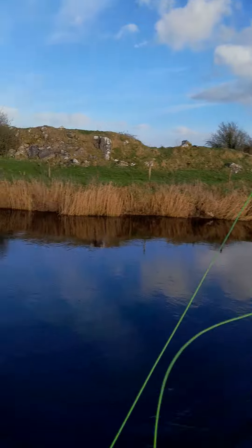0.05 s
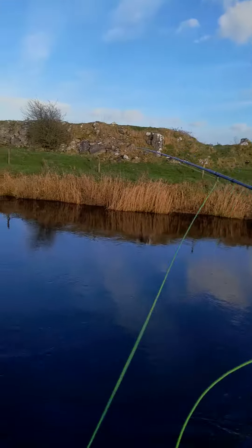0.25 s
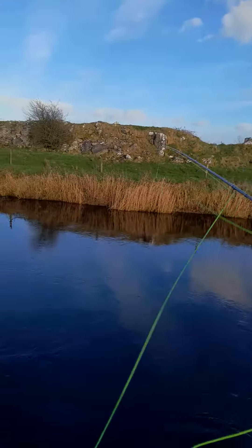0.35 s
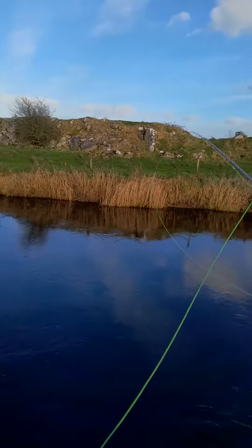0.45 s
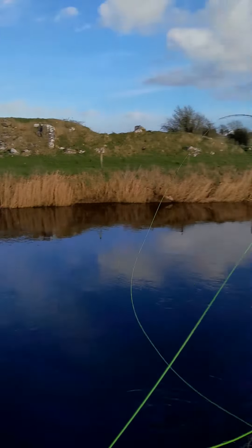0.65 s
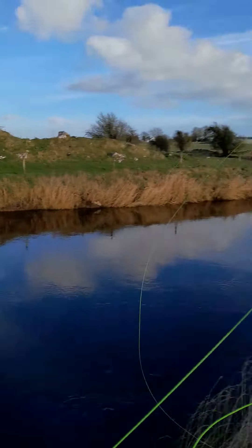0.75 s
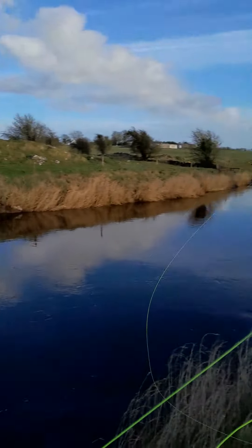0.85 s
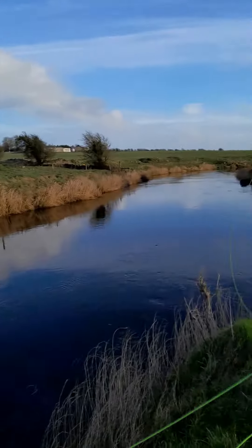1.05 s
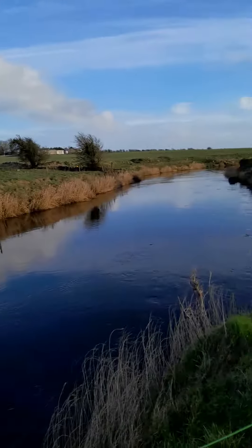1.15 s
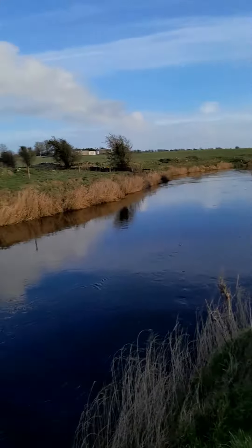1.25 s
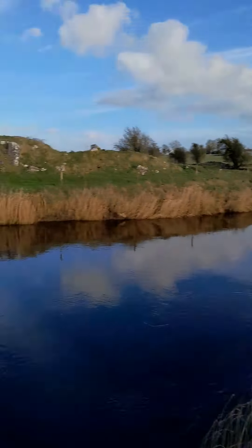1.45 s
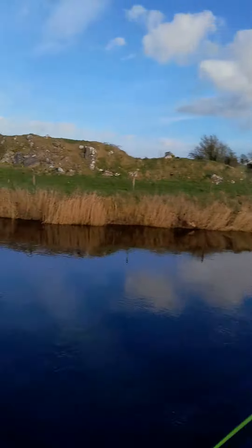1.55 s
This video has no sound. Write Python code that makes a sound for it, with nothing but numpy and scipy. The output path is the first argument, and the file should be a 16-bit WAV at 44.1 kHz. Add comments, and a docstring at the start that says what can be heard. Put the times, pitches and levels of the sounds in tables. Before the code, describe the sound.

Fly line and rod whoosh by a river, shrill brief zip, then heavy wind thumps on the left

```python
"""Two low thumps strike the right port at once, over wind rumble, faint line hiss and a soft rush of air.
A fly rod is swung beside a river, close to a camera: its line zips shrilly through the rings, whistles
down in pitch as it slows, and ticks against the rod. Wind and eddies then hit the left port hardest.
Rumble, hiss, air and zips are shaped noise; eddies are pressure pulses; swishes are gliding noise bands;
ticks are damped sines with a crack of noise."""
import sys
import numpy as np
from scipy import signal
from scipy.fft import rfft, irfft, next_fast_len
from scipy.io import wavfile
from scipy.ndimage import map_coordinates

SR = 44100
rng = np.random.default_rng(int(sys.argv[2]) if len(sys.argv) > 2 else 0)


def store_wav(level_fs):
    """Save 16-bit WAV to argv[1]."""
    pcm = np.round(np.clip(np.atleast_2d(level_fs), -1, 1) * 32767)
    wavfile.write(sys.argv[1], SR, pcm.T.astype(np.int16))


N = 70560
T = np.arange(N) / SR
# pan position of each port name [-1 left .. 1 right]
PORT_PAN = {"left": -1, "both": 0, "right": 1}


def amp(db):
    """Decibels to gain."""
    return 10 ** (np.asarray(db) / 20)


def unit(x):
    """Scale to rms 1."""
    return x / np.sqrt(np.mean(x ** 2) + 1e-20)


def noise():
    """White Gaussian noise, one channel."""
    return rng.standard_normal(N)


def level(rows):
    """Gain per sample, linear in dB between (t/s, level/dB) points."""
    return amp(np.interp(T, *np.transpose(rows)))


def wobble(knots_per_s):
    """Smooth random curve through evenly spaced random knots."""
    return map_coordinates(rng.standard_normal(N // 4), [T * knots_per_s], mode="mirror")


def filtered(x, response):
    """Multiply the spectrum of x by a response of frequency."""
    m = next_fast_len(N + 8192)  # zero padding
    gain = response(np.fft.rfftfreq(m, 1 / SR))
    return irfft(rfft(x, m) * gain, m)[..., :N]


def coloured(x, spectrum):
    """Shape x by (f/Hz, level/dB) points on a log axis, at rms 1."""
    f_hz, db = np.transpose(spectrum)
    return unit(filtered(x, lambda hz: amp(np.interp(np.log(hz + 1), np.log(f_hz), db))))


def placed(x, pan):
    """Equal-power pan between the two ports."""
    angle = (np.clip(pan, -1, 1) + 1) * np.pi / 4
    return np.outer([np.cos(angle), np.sin(angle)], x)


def turbulence(spectrum, window_samples):
    """Churning pressure noise, its power evened out over a sliding window."""
    x = coloured(noise(), spectrum)
    instant_power = np.abs(signal.hilbert(x)) ** 2
    power = signal.fftconvolve(instant_power, signal.windows.hann(window_samples), "same")
    return unit(x / np.sqrt(np.abs(power) + 1e-9))


# rumble at each port, before port limiting [t/s, level/dB]
RUMBLE_LEVEL_LEFT = [(0, -45.5), (.11, -47), (.18, -35.5), (.215, -22), (.272, -20), (.292, -27),
                     (.325, -17.5), (.355, -23.5), (.385, -12), (.42, -18.5), (.447, -48), (.475, -81.5),
                     (.75, -77.5), (.81, -57.5), (.912, -52.5), (.95, -78), (1.3, -83), (1.35, -66),
                     (1.47, -67), (1.55, -58.5), (1.6, -62)]
RUMBLE_LEVEL_RIGHT = [(0, -33), (.1, -44.5), (.31, -41.5), (.45, -51), (.6, -52.5), (.76, -69.5),
                      (.772, -52), (.815, -50), (.835, -61.5), (.885, -48.5), (.925, -53), (.96, -64.5),
                      (1.06, -66), (1.15, -54.5), (1.2, -69.5), (1.34, -53.5), (1.37, -71.5), (1.6, -77)]
# rumble spectra, and the brighter churn of faster air on the left [f/Hz, level/dB per Hz]
RUMBLE_SPECTRUM_LEFT = [(20, -40.5), (42, -9.5), (70, 6.5), (135, 2), (250, -13.5), (400, -28),
                        (700, -53.5), (1500, -89.5)]
RUMBLE_SPECTRUM_RIGHT = [(20, -21), (40, 5), (70, 1.5), (150, -0.5), (300, -12.5), (500, -28.5),
                         (1000, -35.5), (3000, -84.5)]
CHURN_SPECTRUM = [(90, -14), (125, 3), (210, 3), (370, -7), (500, -18.5), (800, -33.5), (1150, -40.5),
                  (1700, -56.5), (2500, -80)]
CHURN_DB, CHURN_EXPONENT = 2, 1.42  # level at rumble gain 1; exponent on rumble gain


def buffeting():
    """Independent turbulence at each port; on the left, stronger gusts are brighter."""
    gust = level(RUMBLE_LEVEL_LEFT)
    rumble = gust * turbulence(RUMBLE_SPECTRUM_LEFT, window_samples=900)
    churn_gain = amp(CHURN_DB) * gust ** CHURN_EXPONENT
    churn = churn_gain * turbulence(CHURN_SPECTRUM, window_samples=600)
    right = level(RUMBLE_LEVEL_RIGHT) * turbulence(RUMBLE_SPECTRUM_RIGHT, window_samples=1600)
    return np.array([rumble + churn, right])


# eddies, before rebound and port limiting [t/s, peak level/dB, centre f/Hz, port]
EDDY_HITS = [(.0049, -16.5, 400, "right"), (.0077, -17, 171.5, "right"), (0.2099, -2.5, 250, "left"),
             (0.2204, -10, 120, "left"), (.2229, -6.5, 180, "left"), (0.3746, -5.5, 250, "left"),
             (0.3782, 3.5, 165, "left"), (0.3858, -1, 135, "left"), (0.3884, -8.5, 210, "left"),
             (0.4021, -10.5, 190, "left"), (.4135, -9, 160, "left")]
REBOUND_HZ, REBOUND_Q = 68, 1.5


def eddies():
    """A passing eddy is a brief suction between two small pressure rises, then a low rebound."""
    out = np.zeros((2, N))
    for start_s, db, centre_hz, port in EDDY_HITS:
        u = (np.pi * centre_hz * (T - start_s)) ** 2
        pulse = (3 * u - 1) / (1 + u) ** 3
        out += placed(amp(db) * pulse, PORT_PAN[port])

    def rebound(hz):  # resonant high-pass
        return hz ** 2 / (hz ** 2 - REBOUND_HZ ** 2 - 1j * hz * REBOUND_HZ / REBOUND_Q)
    return filtered(out, rebound)


PORT_LIMIT, PORT_CUTOFF_HZ = 1, 1750


def wind():
    """The ports give way softly under the hardest blows and muffle what gets through."""
    pressure = PORT_LIMIT * np.tanh((buffeting() + eddies()) / PORT_LIMIT)
    return filtered(pressure, lambda hz: 1 / np.sqrt(1 + (hz / PORT_CUTOFF_HZ) ** 8))


CATCHES_PER_S = 900


def friction(spectrum, grain_db):
    """Smooth sliding noise with a dense patter of tiny catches."""
    catches = (rng.random(N) < CATCHES_PER_S / SR) * (rng.random(N) - .5)
    return coloured(noise() + amp(grain_db) * unit(catches), spectrum)


# line hiss on each side [t/s, level/dB]
HISS_LEVEL_LEFT = [(0, -55.5), (.1, -56.5), (.122, -51.5), (.16, -57.5), (.21, -53.5), (.24, -61),
                   (.36, -67.5), (.5, -78.5), (.68, -77), (.78, -72.5), (.91, -68.5), (1.05, -81.5),
                   (1.2, -79.5), (1.39, -69.5), (1.48, -73), (1.6, -60.5)]
HISS_LEVEL_RIGHT = [(0, -55.5), (.05, -47), (.09, -62), (.12, -55.5), (.18, -65.5), (.29, -64),
                    (.47, -76.5), (.9, -71.5), (.95, -84.5), (1.06, -82), (1.18, -66.5), (1.33, -63),
                    (1.41, -63.5), (1.47, -71.5), (1.58, -64)]
# hiss spectra [f/Hz, level/dB per Hz]
LINE_SPECTRUM_LEFT = [(500, -33.5), (1500, -7.5), (2800, 2.5), (5000, -4.5), (6800, -1), (8200, -3.5),
                      (9300, -13.5), (12000, -8.5), (15500, -9)]
LINE_SPECTRUM_RIGHT = [(500, -27), (1300, -11.5), (2200, -0.5), (4200, -0.5), (6500, -0.5), (8100, -12),
                       (9500, -12), (11500, -5.5), (15500, -10.5)]


def sliding_line():
    """Sliding friction hisses on the left and, a little more coarsely, on the right."""
    left = level(HISS_LEVEL_LEFT) * friction(LINE_SPECTRUM_LEFT, grain_db=-3.0)
    right = level(HISS_LEVEL_RIGHT) * friction(LINE_SPECTRUM_RIGHT, grain_db=0.5)
    return np.array([left, right])


# rush of air over bank and reeds, before port gains and flutter [t/s, level/dB]
AIR_LEVEL = [(0, -52.5), (.1, -55), (.3, -58.5), (.45, -74.5), (.6, -70.5), (.73, -77), (.88, -70.5),
             (1.04, -75), (1.26, -72.5), (1.37, -77), (1.48, -74), (1.55, -63), (1.6, -68.5)]
# its spectrum [f/Hz, level/dB per Hz]
REED_SPECTRUM = [(120, -37), (260, 8.5), (450, 8.5), (750, 3), (1300, -3.5), (2000, -2.5), (3500, -15.5),
                 (8000, -34.5), (16000, -51.5)]
AIR_PORT_GAIN_DB = [[1.5], [5.5]]  # left, right
FLUTTER_DB, FLUTTER_KNOTS_PER_S = 0.37, 38


def air():
    """Diffuse rush: independent, slightly fluttering noise at the two ports."""
    ports = []
    for _ in range(2):
        rush = coloured(noise(), REED_SPECTRUM)
        ports.append(rush * amp(FLUTTER_DB * wobble(FLUTTER_KNOTS_PER_S)))
    return level(AIR_LEVEL) * np.array(ports) * amp(AIR_PORT_GAIN_DB)


# line and rod cutting the air [t/s, length/s, start f/Hz, end f/Hz, width/Hz, level/dB, port]
SWISH_EVENTS = [(0.015, 0.062, 996.3, 1096, 2940, -40.5, "right"),
                (0.108, 0.056, 5530, 3140, 1200, -50.5, "left"),
                (0.14, 0.09, 6100, 3880, 890, -54.5, "left"), (0.372, 0.32, 360, 419.3, 408, -61.5, "both"),
                (0.698, .28, 2293, 2796, 1504, -73, "both"), (1.251, .21, 12000, 12470, 6400, -67, "right")]


def swishes():
    """Shed vortices make a noise band that swells, fades and glides in pitch."""
    out = np.zeros((2, N))
    for start_s, length_s, start_hz, end_hz, width_hz, db, port in SWISH_EVENTS:
        u = np.clip((T - start_s) / length_s, 0, 1)
        centre_hz = start_hz * (end_hz / start_hz) ** u
        phase = 2 * np.pi * np.cumsum(centre_hz) / SR
        a, b = filtered(rng.standard_normal((2, N)), lambda hz: np.exp(-2 * (hz / width_hz) ** 2))
        band = unit(a * np.cos(phase) + b * np.sin(phase))
        out += placed(amp(db) * np.sin(np.pi * u) * band, PORT_PAN[port])
    return out


# line jerking through the rings [t/s, level/dB, t60/s]
ZIP_EVENTS = [(0.104, -33, 0.09), (0.205, -54, 0.035)]
# its spectrum [f/Hz, level/dB per Hz]
ZIP_SPECTRUM = [(2000, -32), (4000, -29), (5500, -14.5), (6800, -11), (7600, -5.5), (8300, -5),
                (9300, -22.5), (11000, -27.5), (15500, -22.5)]
ZIP_ATTACK_S = 0.0043


def zips():
    """A sudden pull makes the line sing shrilly in the rings and die away, on the left."""
    envelope = np.zeros(N)
    for start_s, db, t60_s in ZIP_EVENTS:
        rise = np.clip((T - start_s) / ZIP_ATTACK_S, 0, 1)
        decay_db = -60 * np.maximum(T - start_s - ZIP_ATTACK_S, 0) / t60_s
        envelope += rise * amp(db + decay_db)
    return placed(envelope * coloured(noise(), ZIP_SPECTRUM), PORT_PAN["left"])


# line tapping the rod [t/s, level/dB, ring f/Hz, port]
TICK_EVENTS = [(.165, -38.5, 2170, "right"), (0.278, -39.5, 2600, "right"), (0.675, -49, 5200, "right"),
               (.882, -50.5, 900, "right")]
CRACK_T60_S, CRACK_GAIN = 0.051, .2
RING_DECAY_CYCLES = 1.9  # to 1/e


def ticks():
    """A light tap is a tiny noise crack with a short damped ring."""
    out = np.zeros((2, N))
    for start_s, db, ring_hz, port in TICK_EVENTS:
        t = np.maximum(T - start_s, 0)
        ring = np.sin(2 * np.pi * ring_hz * t) * np.exp(-ring_hz * t / RING_DECAY_CYCLES)
        crack = CRACK_GAIN * amp(-60 * t / CRACK_T60_S) * coloured(noise(), LINE_SPECTRUM_RIGHT)
        out += placed((T > start_s) * amp(db) * (ring + crack), PORT_PAN[port])
    return out


def scene():
    """All sources in the open air, without echo."""
    return wind() + sliding_line() + air() + swishes() + zips() + ticks()


WIND_FILTER_HZ, TOP_HZ = 35.82, 15800


def record(dry):
    """The camera cuts the deepest rumble and keeps nothing above its band limit."""
    return filtered(dry, lambda hz: (1 - np.exp(-(hz / WIND_FILTER_HZ) ** 4)) * (hz < TOP_HZ))


dry = scene()
out = record(dry)
store_wav(out)
```